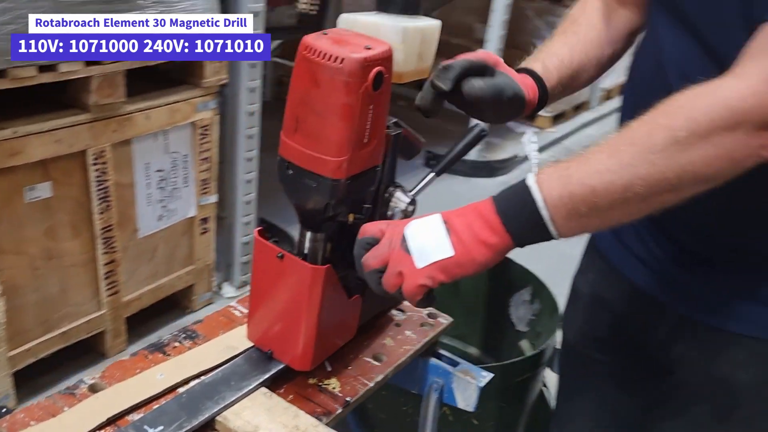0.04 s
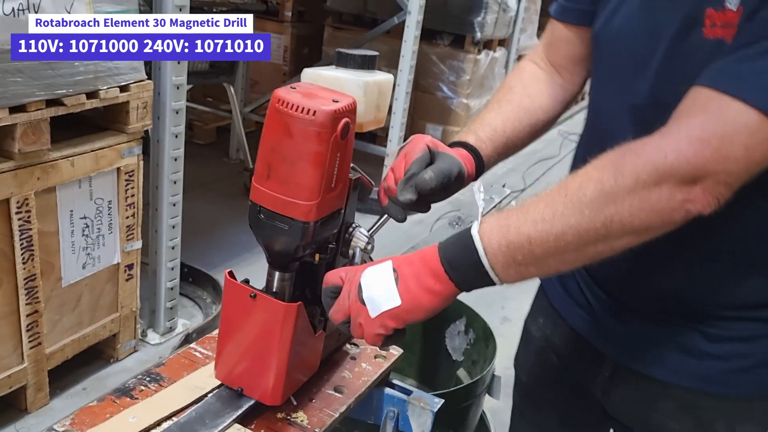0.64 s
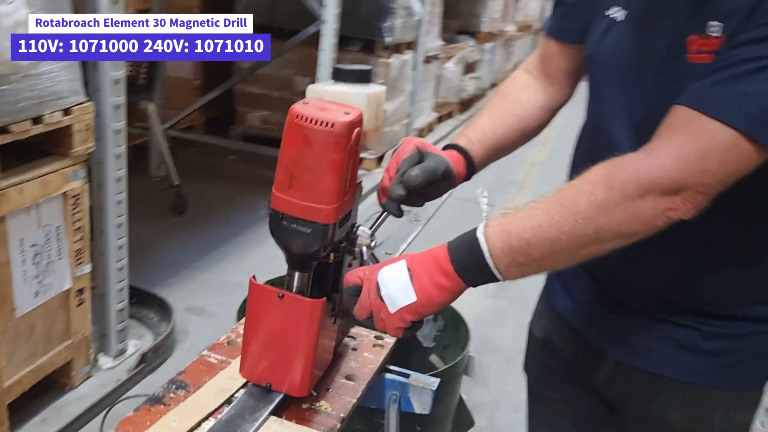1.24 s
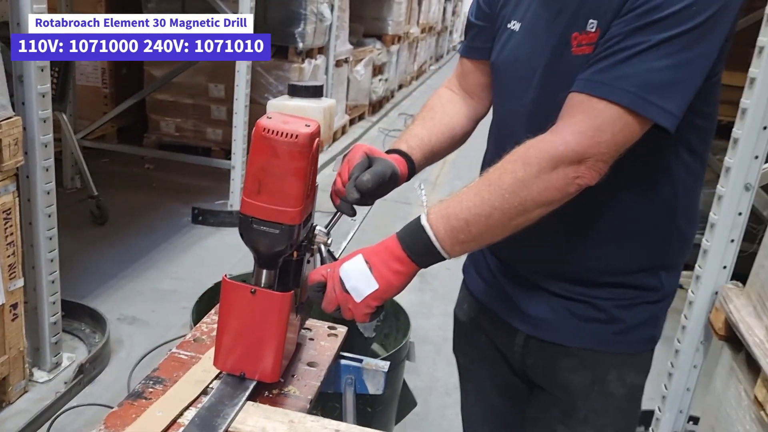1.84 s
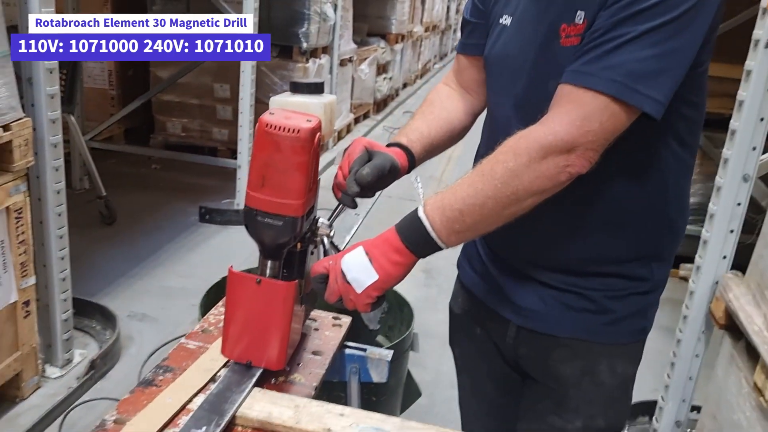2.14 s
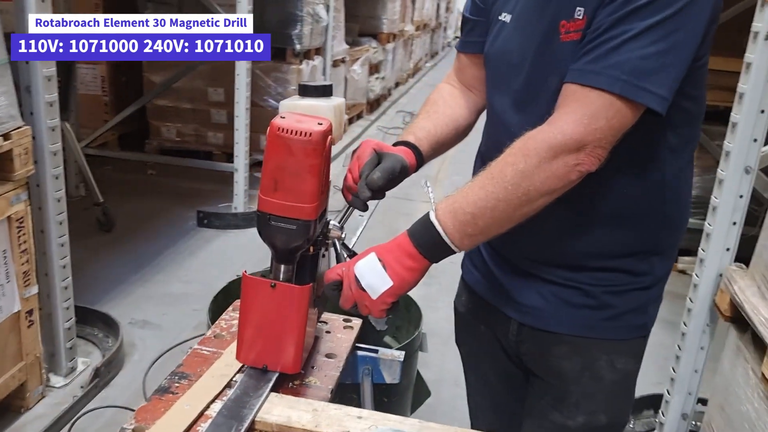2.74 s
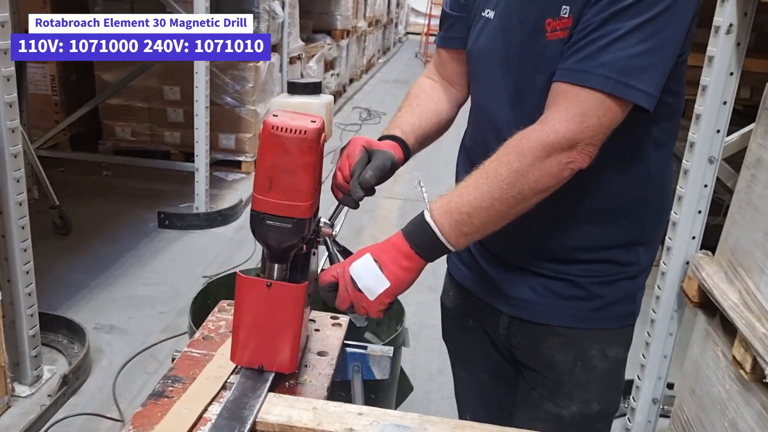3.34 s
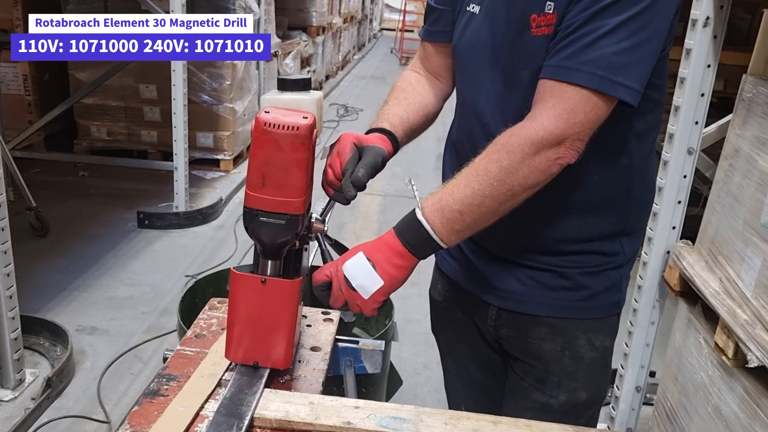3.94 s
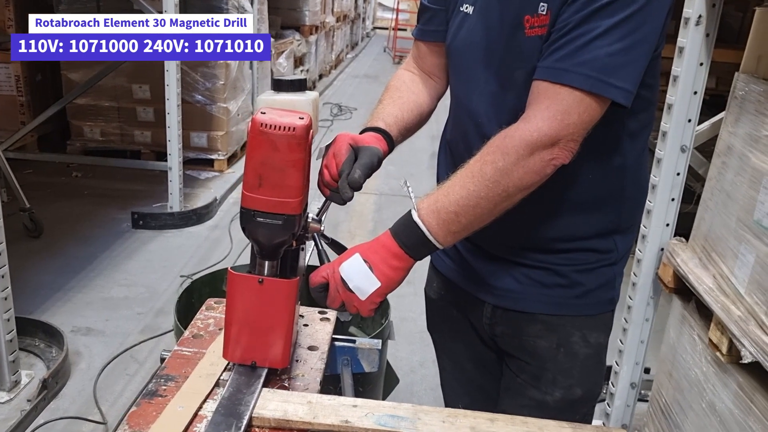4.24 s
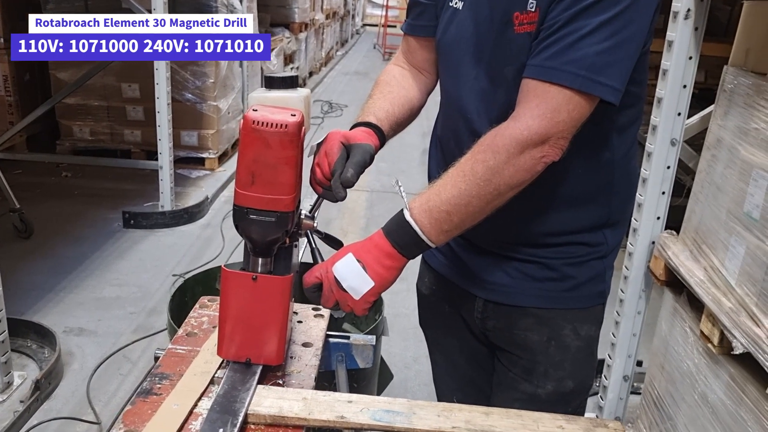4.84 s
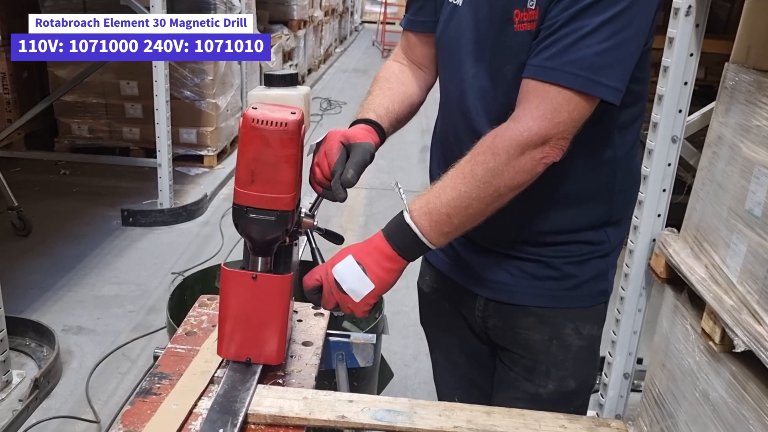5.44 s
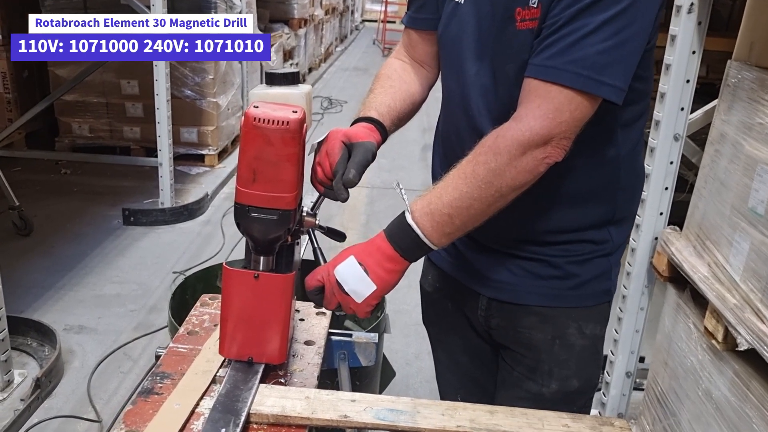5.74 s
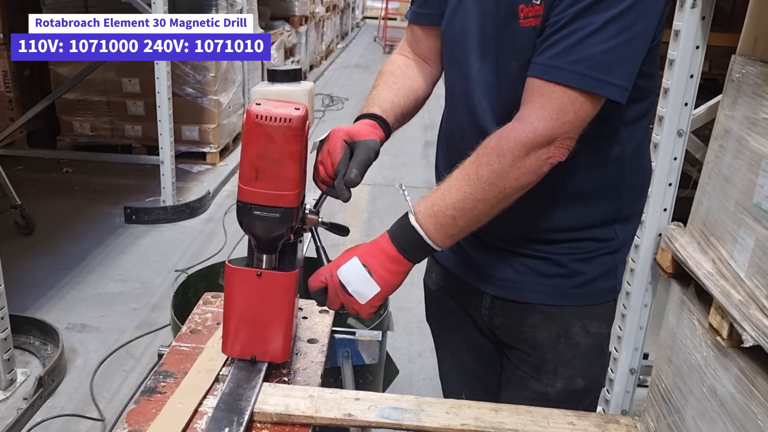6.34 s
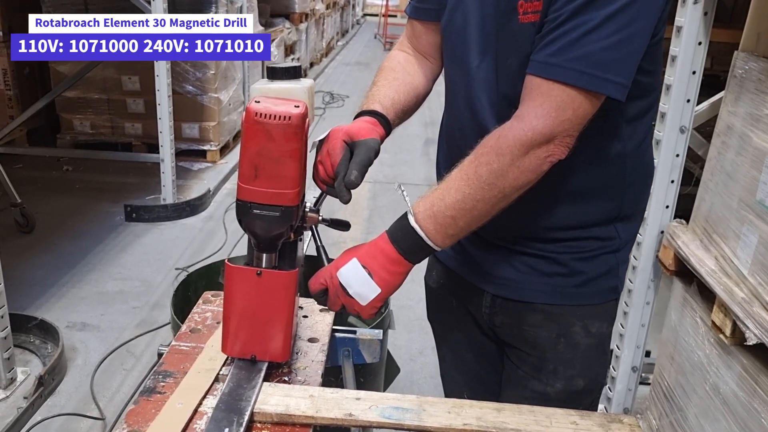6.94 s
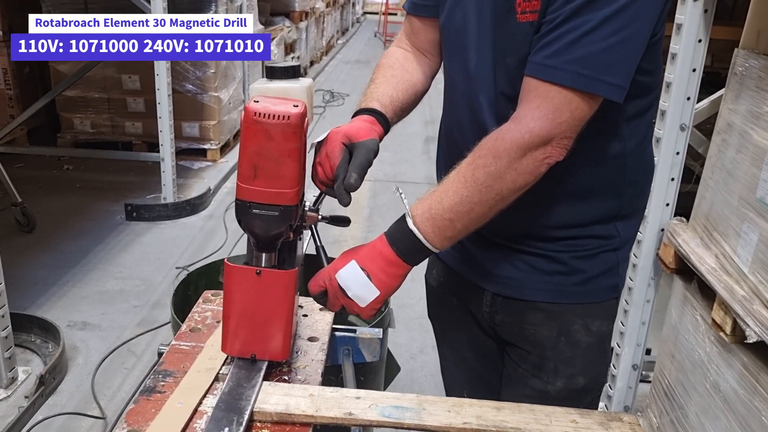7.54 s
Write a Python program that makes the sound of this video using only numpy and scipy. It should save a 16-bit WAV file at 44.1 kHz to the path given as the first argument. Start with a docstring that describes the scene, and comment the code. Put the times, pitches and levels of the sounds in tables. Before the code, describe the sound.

Close by in a warehouse, an electric drill bores through steel. Its high, many-toned whine sags during the first second as the teeth bite with a bright metallic ring. The ring fades and the motor keeps working under load, single tones swelling and fading above a fast pulsing scrape, gear rattle and air hiss. A faint low rumble lies underneath, and the drilling never stops.

```python
"""A warehouse: a magnetic drill feeds an annular cutter into a steel rail, a metre away.
The motor sags as the teeth bite, then labours on. Armature and gears sing on multiples of their speeds.
The gearbox rattles once an armature turn; the cutter's scrape throbs once a spindle turn.
Cooling air hisses, ventilation rumbles, and racks and roof scatter the noise around the direct tones."""
import sys
import numpy as np
from scipy import signal
from scipy.fft import rfft, irfft, next_fast_len
from scipy.io import wavfile

SR = 44100
rng = np.random.default_rng(int(sys.argv[2]) if len(sys.argv) > 2 else 0)


def wav_out(sig):
    """Save sig, one row per channel (or a flat mono array), as 16-bit PCM at SR to the path in sys.argv[1]."""
    wavfile.write(sys.argv[1], SR, np.round(np.clip(np.atleast_2d(sig).T, -1, 1) * 32767).astype(np.int16))


N = 334719
TIME_S = np.arange(N) / SR
N_FFT = next_fast_len(N)
FREQS_HZ = np.arange(N_FFT // 2 + 1) * SR / N_FFT
MESH_RATIO = 36 / 35  # gear mesh rate / armature speed
HOP = 100  # samples per step of the pitch-dependent gains


def amp(db):
    """Decibels to gain."""
    return 10 ** (np.asarray(db) / 20)


def over_time(table):
    """A (t/s, value) table, linearly interpolated."""
    return np.interp(TIME_S, *np.transpose(table))


def over_freq(table):
    """An (f/Hz, value) table, interpolated in log frequency."""
    hz, value = np.transpose(table)
    return np.interp(np.log(FREQS_HZ + 1), np.log(hz), value)


def bell(x, centre, width):
    """Gaussian of height 1; full width at 1/e."""
    return np.exp(-(2 * (x - centre) / width) ** 2)


def colour(x, spectrum):
    """Shape a white excitation to a density spectrum (f/Hz, level/dB)."""
    shaped = rfft(x / x.std(), N_FFT) * amp(over_freq(spectrum))
    return irfft(shaped, N_FFT)[:N] * np.sqrt(SR / 2)


def wander(rate_hz):
    """Smooth complex noise of unit power, rate_hz new values a second."""
    count = int(rate_hz * N / SR) + 4
    knots = signal.resample(rng.standard_normal(count) + 1j * rng.standard_normal(count), 8 * count)
    return np.interp(TIME_S * rate_hz * 8, np.arange(len(knots)), knots) / np.sqrt(2)


def ring(hz, width_hz):
    """A resonance kept ringing by friction, rms 1."""
    return np.sqrt(2) * np.real(wander(width_hz) * np.exp(2j * np.pi * hz * TIME_S))


def impacts(rate_hz, spread_db):
    """Dense tiny collisions of uneven size, rms 1."""
    hits = (rng.random(N) < rate_hz / SR) * rng.standard_normal(N)
    hits *= amp(spread_db * rng.standard_normal(N))
    return hits / hits.std()


def motor_whine(angle, speed_hz, throb):
    """Strong armature and mesh tones; they swell and fade as the speed slides them through resonances."""
    # order, level/dB, left-right/dB, left lead/rad, flutter, roughness, spindle throb/dB
    strong = [(2, -21, 6, 1.12, 0.13, 0.11, 0), (1, -42.5, -0.5, 1.27, 0.36, 0.2, -0.7),
              (3, -36, 1.5, 0.7, 0.29, 0.45, .5), (6, -42.5, -2, -0.1, 0.27, 0.49, 1),
              (7, -39, -3, 1.3, 0.38, 0.63, 3), (10, -36, -5.5, 2.5, 0.39, 0.42, 0),
              (16, -33.5, -2.5, -1.4, 0.32, 0.55, 0)]
    out = 0
    for k, db, pan_db, lead_rad, flutter, rough, throb_db in strong:
        k = round(k)
        level_db = db + flare(k) + throb_db * throb
        if k == 1:  # armature and mesh beat at about 10 Hz
            tones = [(1, 0.5), (MESH_RATIO, 0)]
        elif k == 16:  # an order of the mesh rate
            tones = [(k * MESH_RATIO, 0)]
        else:
            tones = [(k, 0)]
        for order, trim_db in tones:
            tone_db = level_db + trim_db + resonance(order * speed_hz)
            out = out + partial(order * angle, tone_db, pan_db, lead_rad, flutter, rough)
    return out


def gear_train(angle, throb, feed_db):
    """Weaker partials of armature, spindle gear and wobbling shafts."""
    # all three: order, level/dB, left-right/dB, left lead/rad
    armature_tones = [(4, -31.5, 2, 2), (5, -38, -1, -2), (8, -33, -6.5, 1.1), (9, -32.5, 0.5, 2),
                      (11, -38, 3.5, 0.5), (12, -39, 3, 3.5), (13, -41.5, 4, -7), (14, -41, -10, -2),
                      (15, -44.5, -16, -6), (17, -38.5, 0, 0), (18, -62, -1, -8), (19, -47, -4, 3),
                      (23, -40, -6, 0.6), (24, -49, -9, -2)]
    mesh_tones = [(2, -38.5, 4.5, 0.39), (11, -39, -4, 2.1), (12, -36, -1, 4.6), (20, -48, -2, 0.3),
                  (24, -45, 12, 2.2)]  # orders of the mesh rate
    shaft_sidebands = [(2.143, -38.5, -18, 0.3), (2.971, -36, 1, 1), (3.029, -36, -1, 0.69),
                       (3.143, -41, 2, 0.7), (5.143, -33, -5, 1.66), (8.143, -37, -10, 1.8),
                       (8.286, -38, -14, 1.9), (12.63, -47.5, -7, 4.9)]
    armature = sum(partial(round(k) * angle, db - 4 + flare(round(k)) + 0.96 * throb, *stereo,
                           flutter=1.0, rough=1.0) for k, db, *stereo in armature_tones)
    tooth_force_db = 0.4 * feed_db
    mesh = sum(partial(round(k) * MESH_RATIO * angle, db + 0.5 + tooth_force_db, *stereo,
                       flutter=0.51, rough=0.43) for k, db, *stereo in mesh_tones)
    wobble = sum(partial(k * angle, db - 5 + 0.62 * throb, *stereo, flutter=0.58, rough=0.59)
                 for k, db, *stereo in shaft_sidebands)
    return armature + mesh + wobble


def partial(angle, db, pan_db, lead_rad, flutter, rough):
    """One stereo machine tone: backlash roughens it, changing reflections make it flutter."""
    # radiation of housing and cutter tube: f/Hz, gain/dB
    radiation = [(300, 0), (2700, 0.5), (2930, -1), (3200, 2), (3470, 1), (3800, 0), (8800, 0), (9400, 1),
                 (12000, -19)]
    hz = np.gradient(angle[::HOP]) * SR / (2 * np.pi * HOP)
    radiation_db = np.repeat(np.interp(hz, *np.transpose(radiation)), HOP)[:N]
    gain = amp(db + radiation_db) * np.sqrt(2 / (1 + flutter ** 2))
    carrier = gain * np.exp(1j * (angle + rng.uniform(0, 2 * np.pi)))
    shared = 1 + 0.95 * flutter * wander(24) + rough * wander(110)
    # reflections differ left to right, more so for high tones
    apart = flutter * min(0.45 + hz.mean() / 9000, 1) * wander(30)
    left = (carrier * (shared + apart) * np.exp(1j * lead_rad)).real * amp(pan_db / 2)
    right = (carrier * (shared - apart)).real * amp(-pan_db / 2)
    return np.array([left, right])


def flare(order):
    """Gain in dB of a partial that sings out now and then."""
    # order, t/s, width/s, gain/dB
    swells = [(1, 6.4, 0.93, 3.5), (2, 1.792, 0.83, 6.5), (2, 5.73, 1, 2.5), (4, 4.84, 1.7, 4.5),
              (5, 1.84, 1, 6), (5, 2.33, .3, 7), (5, 6.87, 1.7, 8.5), (6, 2.46, 0.65, 11),
              (6, 3, 0.48, 6.5), (6, 6.94, 0.77, 6.5), (7, 6.05, 0.21, 7), (8, 0.42, 0.4, 4.5),
              (8, 3.13, 0.81, 7), (8, 7.1, 2.8, 6.5), (9, 0.9, 0.9, 7.5), (9, 4.416, 0.69, 5.5),
              (10, 5.05, 0.25, 5.5), (10, 6.45, 1.2, 5), (14, 4.4, 1.1, 10), (16, 3.52, 1.4, 6),
              (16, 7.55, 0.6, 8), (23, 5.8, 0.68, 6)]
    return sum(db * bell(TIME_S, at_s, width_s) for k, at_s, width_s, db in swells if round(k) == order)


def resonance(hz):
    """Gain in dB that housing and rail give a gliding tone."""
    # resonances and cancellations: f/Hz, width/Hz, gain/dB
    modes = [(378.7, 26, 7), (430, 52, -4), (711.2, 15.8, -16), (725.8, 21.1, -7), (759, 20, 6),
             (926, 115, -9.5), (1044.7, 42, 6.5), (1260, 49, 5.5), (1420, 130, -1), (2135, 50.3, 2),
             (2514, 74, 8), (2720, 110, 9), (3497, 70, 6), (5670, 80, 2), (5850, 114.5, -4),
             (6480, 401, 5.5), (6800, 350, 5.5)]
    gain_db = sum(db * bell(hz[::HOP], centre_hz, width_hz) for centre_hz, width_hz, db in modes)
    return np.interp(TIME_S, TIME_S[::HOP], gain_db)


def cutter(angle, throb, feed_db):
    """Chips tear off in tiny slips, jogged by the gears; the tube rings and single teeth catch."""
    # scrape density: f/Hz, level/dB
    spectrum = [(500, -93), (1400, -63.5), (1900, -54.5), (2350, -61.5), (3000, -53.5), (3500, -55.5),
                (4000, -57), (4500, -55), (5400, -58.5), (6200, -62), (7700, -69), (8800, -67),
                (10000, -71.5), (16000, -84)]
    # tube ring, dying as it seats in its groove: t/s, level/dB
    seating = [(0, -22.5), (.2, -25), (.35, -27), (.9, -27.5), (1.3, -31), (2, -45)]
    # teeth catching the steel: t/s, f/Hz, width/s, level/dB
    catches = [(.197, 3500, .04, -19), (.2, 2750, .05, -21), (.228, 2230, .024, -19),
               (.288, 2230, .026, -18), (.283, 5500, .04, -21)]
    press_db = 0.64 * throb + 2.2 * wander(60).real
    jog_db = np.cos(angle) + 1.3 * np.cos(2 * angle) + 0.73 * np.cos(4 * MESH_RATIO * angle)
    slips = impacts(rate_hz=20000, spread_db=4.0) * amp(press_db + jog_db)
    scrape = colour(slips, spectrum) * amp(feed_db)
    tube = (ring(3480, 260) + 0.75 * ring(3400, 700)) * amp(over_time(seating) + 1.5 + press_db)
    bites = sum(amp(db) * bell(TIME_S, at_s, width_s) * ring(hz, 0.12 * hz)
                for at_s, hz, width_s, db in catches)
    return scrape + tube + bites


def gearbox(angle, throb, speed_oct, feed_db):
    """Teeth knock through their backlash, hardest once an armature turn."""
    # rattle density: f/Hz, level/dB
    spectrum = [(150, -100), (300, -72), (420, -65), (530, -62), (640, -54), (780, -49), (950, -52),
                (1150, -51), (1600, -56.5), (2300, -61), (5000, -81), (16000, -100)]
    knocks = impacts(rate_hz=5000, spread_db=2.5)
    knocks *= amp(3.4 * np.cos(angle) + 0.5 * throb + 1.3 * wander(25).real)
    return colour(knocks, spectrum) * amp(0.3 + 4.5 * speed_oct + 0.57 * feed_db)


def bench(speed_oct):
    """The bench rumbles, louder with motor speed."""
    # rumble density: f/Hz, level/dB
    spectrum = [(60, -100), (130, -80.5), (175, -75.5), (215, -66), (260, -64.5), (310, -70), (500, -72),
                (1500, -110)]
    return colour(rng.standard_normal(N), spectrum) * amp(-2.5 + 18.5 * speed_oct)


def fan(angle, speed_oct, feed_db):
    """Cooling air and brush hiss, chopped lightly by the armature and gusting a little."""
    # hiss density: f/Hz, level/dB
    spectrum = [(300, -90), (2000, -70), (6500, -64.5), (8000, -67.5), (9500, -69.5), (11400, -74),
                (13200, -66.5), (15600, -71.5)]
    chop_db = 1.4 * np.cos(angle) + 1.1 * np.cos(2 * angle)
    hiss = colour(rng.standard_normal(N) * amp(chop_db), spectrum)
    gust_db = 1.5 * wander(13).real
    return hiss * amp(25.5 * speed_oct + 0.25 * feed_db + gust_db)


def ventilation():
    """Steady low noise of the hall's ventilation."""
    # noise density: f/Hz, level/dB
    spectrum = [(20, -97), (40, -90), (65, -82.5), (110, -82.5), (200, -85), (800, -105)]
    return colour(rng.standard_normal(N), spectrum)


def warehouse(x, scatter_scale, t60_s):
    """Direct sound reaches two microphones out of step; racks and roof return a tail to each."""
    # f/Hz, scattered share of the power
    scattered = [(60, 0.057), (300, 0.079), (1000, 0.4), (2100, 0.39), (3100, 0.23), (4200, 0.14),
                 (5400, 0.36), (7100, 0.39), (8500, 0.49), (10000, 0.56), (12000, 0.87), (15000, 0.72)]
    # f/Hz, left lead/rad
    left_lead = [(0, -0.5), (700, 1.38), (1750, 3), (2250, 0.86), (3300, 2), (3650, 2), (4000, 3),
                 (4500, 3.5), (5400, 4.5), (5800, 4.5), (7500, 7), (9200, 9), (16000, 22)]
    # f/Hz, left-right/dB
    balance = [(60, 2), (200, -3.5), (400, 4), (700, 0.5), (1300, -0.5), (2400, -1.5), (3000, 1.5),
               (4500, -7.5), (6500, 1), (9500, 0.5), (11200, 0), (12500, -3.5), (15000, -3.5)]
    t = TIME_S[:SR]
    tail = rng.standard_normal((2, SR)) * (t > 0.004) * amp(-60 * t / t60_s)
    tail /= np.sqrt(np.sum(tail ** 2, axis=1, keepdims=True))
    share = np.clip(scatter_scale * over_freq(scattered), 0, 1)
    sides = np.array([[0.5], [-0.5]])
    direct = np.exp(1j * (sides + 0.5) * np.interp(FREQS_HZ, *np.transpose(left_lead)))
    response = np.sqrt(1 - share) * direct + np.sqrt(share) * rfft(tail, N_FFT)
    response *= amp(sides * over_freq(balance))
    # the tail wraps round, so the hall rings from the start
    return irfft(rfft(x, N_FFT) * response, N_FFT)[:, :N]


def scene():
    """Armature speed and feed drive every part of the machine."""
    # armature speed, sagging under load, then recovering a little: t/s, f/Hz
    speed = [(0.0, 472.5), (0.4, 430.4), (0.8, 386.6), (1.0, 373), (1.2, 366.2), (1.6, 365), (2.2, 357.5),
             (2.6, 354.2), (2.85, 350.8), (3.2, 353.3), (3.8, 348.4), (4.5, 346.8), (5.2, 351.5),
             (5.4, 354.3), (5.8, 353.8), (6.2, 358.2), (6.7, 361.5), (7.3, 364)]
    # how hard the cutter is fed: t/s, level/dB
    feed = [(0, -3), (0.15, -3), (0.6, -1.5), (1.0, -3), (1.4, -1), (4.4, -1), (5.4, 1.0), (7.59, 1.5)]
    working_hz, spindle_reduction = 355, 43
    speed_hz = over_time(speed) * (1 + 0.001017 * wander(14).real)
    speed_oct = np.log2(speed_hz / working_hz)
    angle = 2 * np.pi * np.cumsum(speed_hz) / SR
    feed_db = over_time(feed)
    # the cutter runs slightly out of true; feed deepens the throb
    throb = np.cos(angle / spindle_reduction) * amp(1.1 * feed_db)
    noise = gearbox(angle, throb, speed_oct, feed_db) + bench(speed_oct)
    noise += cutter(angle, throb, feed_db) + fan(angle, speed_oct, feed_db) + ventilation()
    hall = warehouse(noise, scatter_scale=1.01, t60_s=1.63)
    return hall + gear_train(angle, throb, feed_db) + motor_whine(angle, speed_hz, throb)


def record(dry):
    """Soft peak limiter, then a steep low-pass."""
    ceiling, top_hz = 0.98, 15750
    limited = dry / (1 + np.abs(dry / ceiling) ** 8) ** (1 / 8)
    return signal.sosfilt(signal.ellip(12, 0.1, 80, top_hz, fs=SR, output="sos"), limited)


dry = scene()
out = record(dry)
wav_out(out)
```